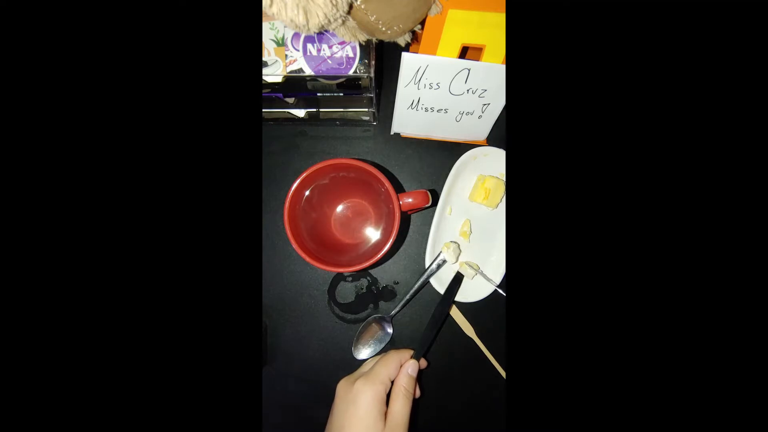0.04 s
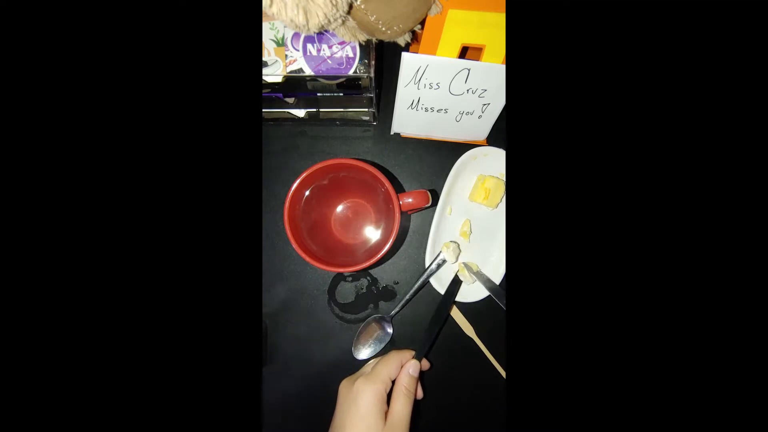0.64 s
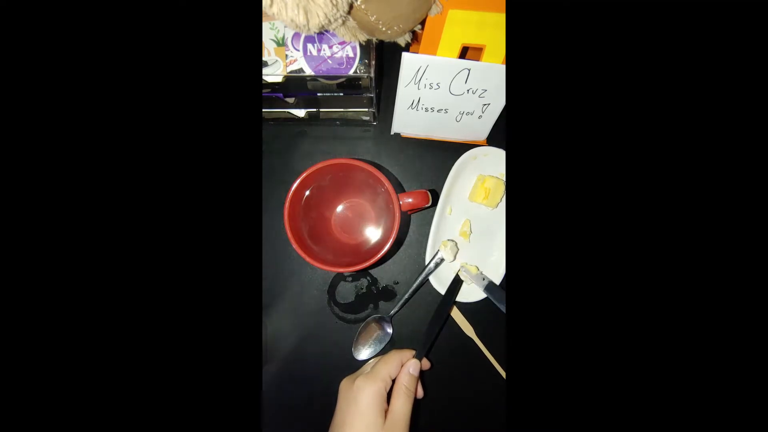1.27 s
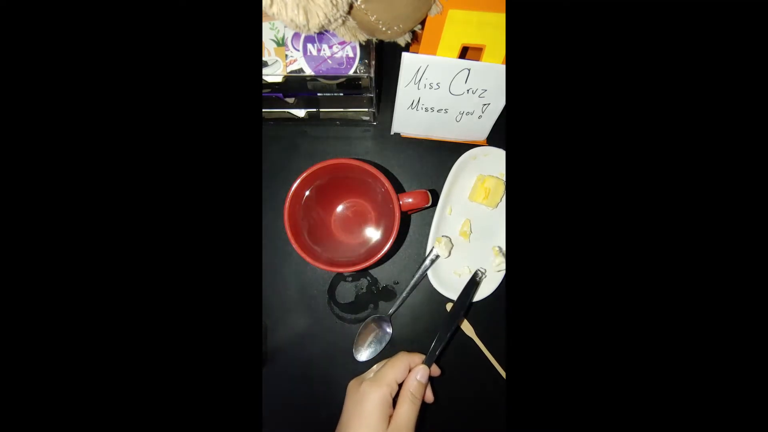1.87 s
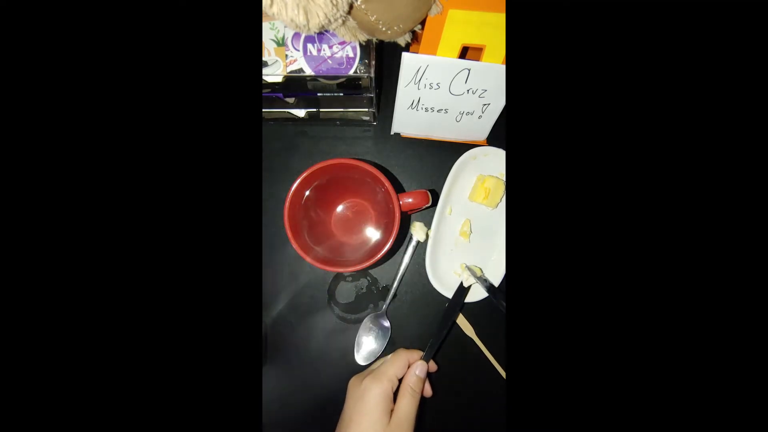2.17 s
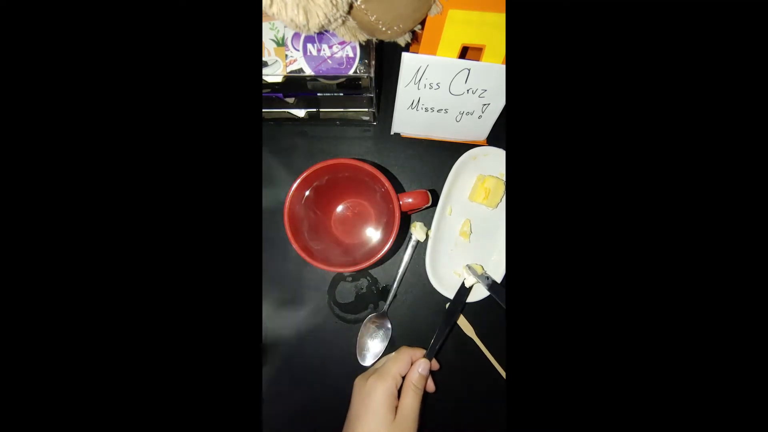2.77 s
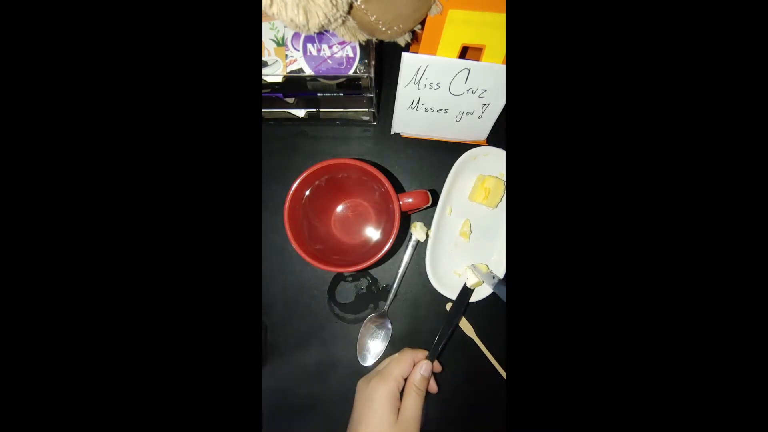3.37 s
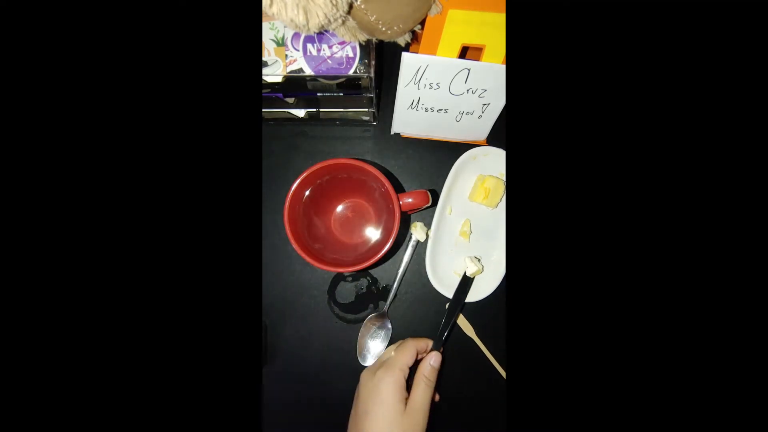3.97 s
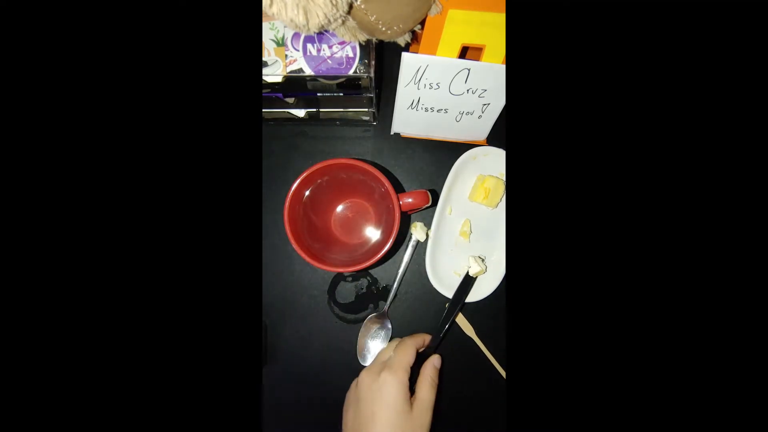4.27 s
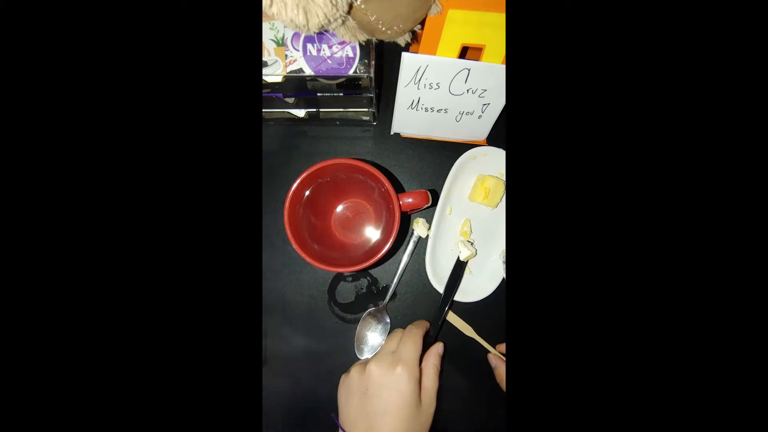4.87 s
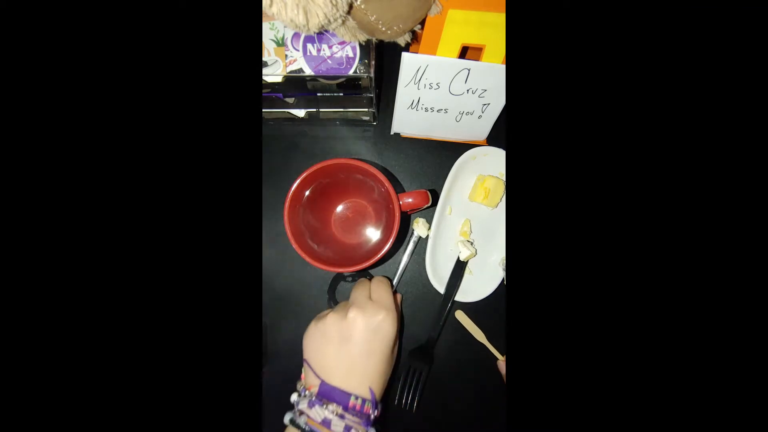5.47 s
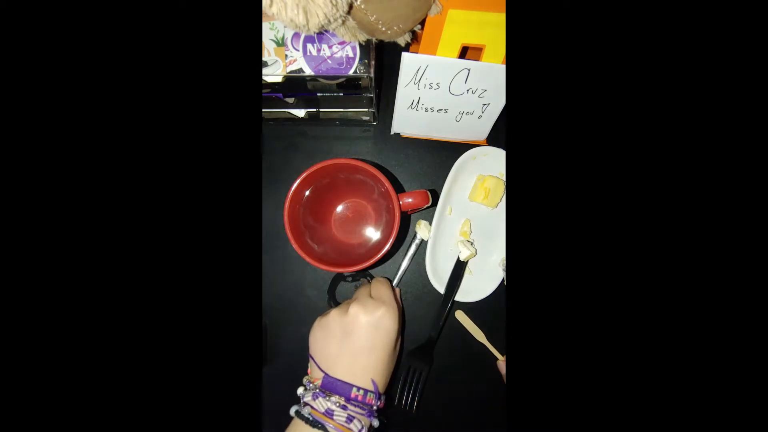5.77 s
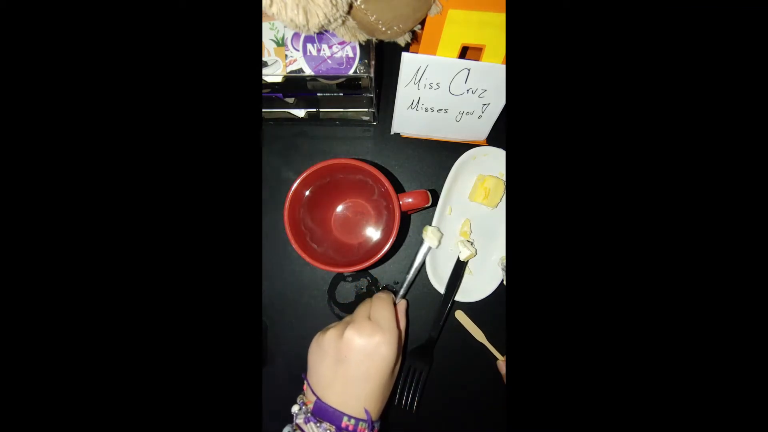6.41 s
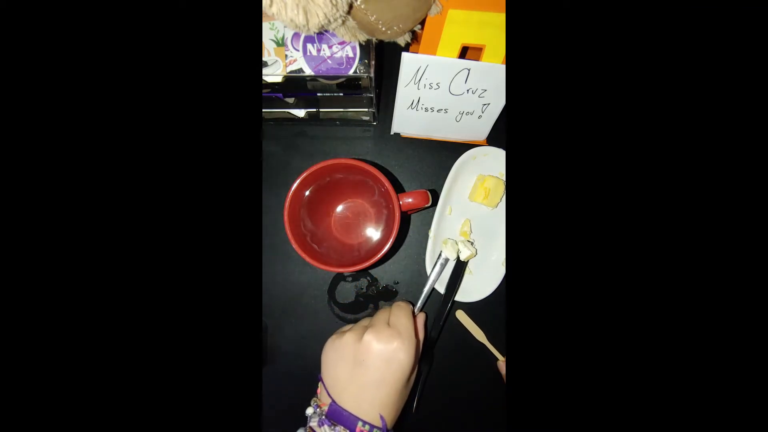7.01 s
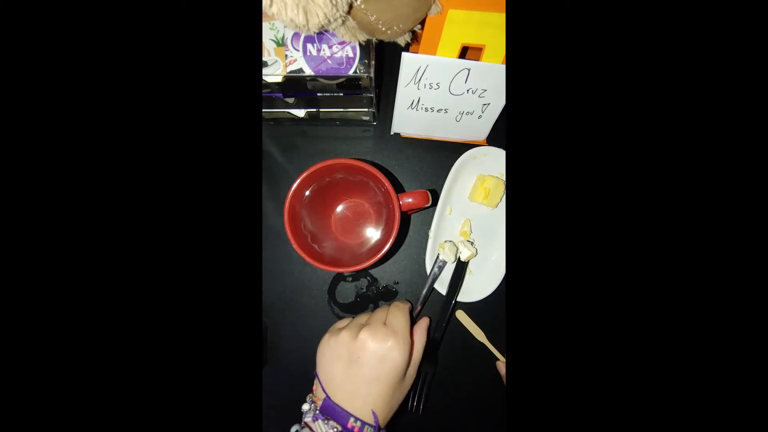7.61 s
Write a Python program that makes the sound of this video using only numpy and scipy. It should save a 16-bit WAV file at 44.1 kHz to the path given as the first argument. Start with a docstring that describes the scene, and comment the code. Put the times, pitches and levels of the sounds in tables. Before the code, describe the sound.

Heard from close by at a desk in a quiet, small room, a knife taps a ceramic plate and makes a run of muffled knocks. A steel spoon slides off and lands with a ringing rattle, followed by more soft knocks and short twangs of cutlery. The spoon is nudged with small clinks, a brief low hum passes, and the spoon is laid back, clinking on the plate and bouncing on the desk.

```python
"""A desk in a small room, a phone microphone close by; over a faint rumble, a metal spoon and a plastic
fork lie with their handles on a ceramic plate. A knife clicks on the plate and presses butter onto the
fork, thumping the desk. At 2 s the spoon slips off the rim, clatters, buzzes and rocks to rest; handles
flex and twang. From 4.6 s a hand nudges the spoon and lifts it, with a brief low drone. Near 7 s it
lays the handle back on the plate and lets the bowl drop, and the steel bounces and rings."""
import sys
import numpy as np
from scipy import signal
from scipy.fft import rfft, irfft, next_fast_len
from scipy.io import wavfile

SR = 44100
rng = np.random.default_rng(int(sys.argv[2]) if len(sys.argv) > 2 else 0)


def to_wav(sig):
    """Store sig (one row per channel, or 1-D mono) as 16-bit WAV at the path in sys.argv[1].

    Samples outside -1..1 are clipped; the rate is SR.
    """
    pcm = np.clip(np.atleast_2d(sig), -1, 1) * 32767
    pcm = np.round(pcm).astype(np.int16)
    wavfile.write(sys.argv[1], SR, pcm.T)  # frames by channels


N = 341642
T = np.arange(SR // 2) / SR  # time within one hit [s]

# ringing modes of what is struck: (frequency [Hz], relative level [dB], t60 [s])
DESK_MODES = [(56, -3, .2), (78, -11, .15), (104, -2, .19), (129, 0, .19), (178, -8, .15)]
BOARD_MODES = [(260, -3, 0.11), (356, -0.5, 0.11), (438, -2.5, 0.081), (525, -0.5, 0.019), (596, -1, 0.14),
               (718, -2.5, .08), (867, -4.5, 0.025), (1070, -9.5, 0.033), (1017, -12, 0.051),
               (1354, -10, 0.081)]  # the desk's higher, woody modes
PLATE_MODES = [(993, 2.5, .035), (1407, -10, 0.037), (2822, -2.5, 0.038), (3230, -4, 0.049),
               (3310, 0.5, 0.03), (4840, -7, .025), (6420, -7.5, 0.094), (6700, -7, .025)]
FREE_SPOON_MODES = [(3607, -8, .2), (4479, -12, .19), (5211, -1, .23), (6245, -9, .16), (6912, -5, .21),
                    (7860, -21, .22), (9663, -10, .16), (9792, -13, .17), (11850, -18, .12),
                    (12130, -19, .1)]
NUDGED_SPOON_MODES = [(345, -15, .15), (1348, -11, .14), (3200, -10, .035), (3262, -8, .065),
                      (4540, -19, .04), (5125, -12, .05), (5350, -8, .03), (5426, -2, .07),
                      (6460, -19, .07), (6910, -17, .04), (7900, -21, .05), (8930, -17, .04),
                      (10548, -19, .045)]
HANDLE_MODES = [(1570, -6.5, 0.021), (2770, -8.5, 0.037), (3265, 0.5, .05), (3788, -10, .04),
                (4660, -0.5, 0.028), (5280, -4.5, 0.046), (6250, -9.5, .04), (6680, -5.5, 0.058),
                (7950, -9.5, .045)]
BOWL_MODES = [(1980, -1.5, 0.29), (2330, -4.5, .09), (2520, -1.5, 0.1), (3260, -2, 0.089),
              (3640, -3, 0.076), (3650, -3.5, .06), (4490, -7, 0.037), (5450, -11, .08)]
# colours of contacts and noises: (frequency [Hz], relative spectral level [dB])
KNOCK_COLOUR = [(60, -26), (230, -15), (400, -2), (620, 0), (820, -6), (1050, -4), (1500, -14), (2500, -36),
                (5000, -70)]
CLACK_COLOUR = [(700, -36), (1400, 3.5), (2200, 3.5), (2900, -5), (4000, -13), (7000, -36.5), (12000, -70)]
SNAP_COLOUR = [(1800, -38), (2800, -5), (3500, 4.5), (4100, -3.5), (5200, -7), (6900, -9), (7700, -29),
               (12000, -59.5)]
TING_COLOUR = [(2300, -40), (3250, 0), (3900, -22), (4800, -16), (5380, 0), (5900, -14), (7000, -16),
               (8200, -28), (13000, -70)]
CRACK_COLOUR = [(3000, -30), (6500, -4), (8600, 0), (10700, -4), (11900, -10), (12700, -36), (15500, -45)]
RUMBLE_COLOUR = [(25, -11), (55, 0), (100, 0), (190, -1.5), (300, -8), (600, -14.5), (1100, -24),
                 (2100, -29.5), (4000, -35), (6600, -39), (9000, -46), (12000, -45), (15000, -48.5)]
RUB_COLOUR = [(150, -11), (450, 5), (800, -1), (1500, -15), (2600, -15), (5000, -23.5), (10000, -31),
              (13000, -42.5)]
HISS_COLOUR = [(1000, -12.5), (5000, 5), (10500, -3.5), (13000, -28)]
# the small room's decay: (frequency [Hz], t60 [s])
ROOM_DECAY = [(100, 0.39), (400, 0.36), (1500, 0.19), (4000, .26), (7000, 0.074), (11000, 0.11)]
# width of diffuse sound at the microphones: (frequency [Hz], side minus mid [dB])
STEREO_WIDTH = [(100, -12.5), (300, -9.5), (600, -3), (1200, 0), (3000, -0.5), (10000, 0)]
# hard touches: (time [s], relative desk knock [dB], relative clink [dB])
KNIFE_ON_PLATE = [(0.6315, -25, -28.5), (1.04, -76.5, -83), (1.2249, -55, -73.5), (2.6863, -49.5, -72),
                  (3.674, -86, -72.5), (3.89, -71, -76)]
HANDLE_ON_PLATE = [(2.0761, -55, -61), (2.171, -39, -53), (6.7062, -39, -53.5), (6.969, -54.5, -87),
                   (7.147, -69.5, -55.5), (7.16, -60, -54), (7.322, -35, -25.5)]
SPOON_NUDGES = [(2.1229, -53, -49), (4.585, -77, -79), (4.828, -73.5, -64.5), (4.893, -58, -49),
                (5.3195, -52, -37.5), (5.3343, -51, -41), (7.1456, -60, -52)]
# hiss after bright clicks: (time [s], level [dB])
HISS_SWELLS = [(0.649, -65), (5.42, -68.5)]
# knife and fingers press: (time [s], relative knock [dB], relative thump [dB])
SOFT_PRESSES = [(0.724, -34.5, -44.5), (1.047, -43.5, -39.5), (1.145, -34.5, -43), (1.223, -25, -37.5),
                (1.245, -45, -45), (1.367, -43, -43.5), (1.604, -35.5, -42), (2.329, -36, -42.5),
                (2.554, -35, -51.5), (2.655, -29.5, -52), (2.685, -37.5, -44.5), (3.010, -57, -50.5),
                (3.191, -52.5, -68.5), (3.504, -48, -64), (4.688, -49, -75), (4.966, -44.5, -67.5),
                (5.575, -42, -51), (5.659, -42, -58.5), (5.741, -52.5, -85)]
# the spoon's handle slips on the plate: (time [s], length [s], starting level [dB])
HANDLE_SLIPS = [(1.92, 0.052, -75), (2.055, 0.12, -64.5)]
# the spoon lands on the desk: (time [s], relative knock [dB], relative clink [dB], free ring [dB],
# first flight [s], left minus right [dB])
SPOON_LANDINGS = [(2.1868, -17, -29, -37, 0.037, 2.5), (2.199, -22, -36, -37.5, 0.0096, -6.5),
                  (7.3084, -17.5, -38, -48, 0.025, -2.5)]
# a handle flexes: (time [s], frequency [Hz], level [dB], t60 [s])
HANDLE_TWANGS = [(2.552, 279, -33.5, 0.055), (2.828, 265.3, -35, 0.24), (3.5, 345.5, -35.5, 0.057),
                 (4.687, 507, -46, 0.14), (4.893, 376.4, -44.5, 0.2), (5.321, 330.3, -33.5, 0.082)]


def amp(db):
    """Decibels to gain."""
    return 10 ** (np.asarray(db) / 20)


def along(points, hz):
    """Read (frequency, value) points on a log frequency axis."""
    f, v = np.transpose(points)
    return np.interp(np.log(hz + 1), np.log(f + 1), v)


def add(track, s, sound):
    """Lay a stereo sound into the track at s seconds."""
    rest = track[:, round(s * SR):]
    rest[:, :sound.shape[1]] += sound[:, :rest.shape[1]]


def unit_hit(x):
    """Scale a hit so that its mean power equals the number of samples in 30 ms."""
    return x / np.sqrt(np.sum(x ** 2) / len(x) / (.03 * SR))


def panned(x, pan_db):
    """Favour the left microphone by pan_db."""
    return x * amp([[pan_db / 2], [-pan_db / 2]])


def spread(pair):
    """Two unrelated signals as mid and side: the bass stays near mono."""
    size = pair.shape[1]
    side = irfft(rfft(pair[1]) * amp(along(STEREO_WIDTH, np.fft.rfftfreq(size, 1 / SR))), size)
    return np.array([pair[0] + side, pair[0] - side])


def noise(colour):
    """Steady, diffuse stereo noise of rms 1."""
    size = next_fast_len(N)
    gain = amp(along(colour, np.fft.rfftfreq(size, 1 / SR)))
    x = spread(irfft(rfft(rng.standard_normal((2, size))) * gain, size))
    return x[:, :N] / x.std()


def swell(s, hold_s, db, attack_s, release_s, slope_db_per_s=0):
    """Gain that rises 60 dB per attack_s up to s, holds or slopes, then falls 60 dB per release_s."""
    t = np.arange(N) / SR - s
    outside = np.maximum(-t, 0) / attack_s + np.maximum(t - hold_s, 0) / release_s
    return amp(db + slope_db_per_s * np.clip(t, 0, hold_s) - 60 * outside)


def room_rumble(db=-66.5):
    """The room's steady, low background."""
    return amp(db) * noise(RUMBLE_COLOUR)


def burst(colour, t60, scatter, lag_s=0.00022):
    """A sharp push, later at the left microphone, and its dying scatter from things nearby."""
    size = len(T)
    hz = np.fft.rfftfreq(size, 1 / SR)
    push = unit_hit(irfft(np.exp(-2j * np.pi * hz * np.array([[lag_s], [0]])), size))
    scattered = unit_hit(spread(rng.standard_normal((2, size))) * amp(-60 * T / t60))
    # minimum-phase colour: nothing sounds ahead of the push
    cepstrum = irfft(np.log(amp(along(colour, hz))), size)
    cepstrum[1:size // 2] *= 2
    cepstrum[size // 2 + 1:] = 0
    coloured = irfft(rfft(scatter * scattered - push) * np.exp(rfft(cepstrum)), size)
    fade = np.minimum(1, np.arange(size)[::-1] / (size / 2)) ** 2
    return unit_hit(coloured * fade)


def ring(modes, vary_db, phase_rad):
    """Damped modes, each at a random strength and a random phase between the microphones."""
    hz, db, t60 = np.transpose(modes)[:, :, None]
    strength, angle = rng.standard_normal((2, len(modes), 1))
    onset = 1 - np.exp(-(np.pi * hz * T) ** 2)
    polarity = (-1) ** np.arange(len(modes))[:, None]
    envelope = amp(db + vary_db * strength - 60 * T / t60) * onset * polarity
    pair = [envelope * np.sin(2 * np.pi * hz * T + side * phase_rad * angle) for side in (1, -1)]
    return unit_hit(np.sum(pair, axis=1))


def in_room(x, wet_db, build_s=0.0028):
    """The close walls answer a hit with a tail whose treble dies first."""
    hz, t, spectra = signal.stft(rng.standard_normal((2, len(T))), SR, nperseg=256)
    decay = amp(-60 * t / along(ROOM_DECAY, hz)[:, None])
    tail = signal.istft(spectra * decay, SR, nperseg=256)[1][:, :len(T)]
    tail = spread(tail * (1 - np.exp(-(T / build_s) ** 2)))
    return x + amp(wet_db) * signal.fftconvolve(x, tail / np.linalg.norm(tail[0]), axes=1)[:, :len(T)]


def desk_thump():
    """The whole desk top booms, nearer to the left microphone."""
    return panned(ring(DESK_MODES, vary_db=3, phase_rad=0.33), pan_db=5)


def contact(knock_db, clink_db, modes, snap, thump_db, clack_db, crack_db, ring_db, snap_db, board_db):
    """A hard hit: its weight knocks the desk and clacks the cutlery; its edge rings what was struck."""
    board = amp(board_db) * ring(BOARD_MODES, vary_db=3, phase_rad=.5)
    knock = burst(KNOCK_COLOUR, t60=0.039, scatter=1) + board
    weight = amp(-1.5) * knock + amp(thump_db) * desk_thump()
    weight += amp(clack_db) * burst(CLACK_COLOUR, t60=.05, scatter=1.5)
    edge = amp(ring_db) * ring(modes, vary_db=3.5, phase_rad=1)
    edge += amp(snap_db) * burst(snap, t60=0.034, scatter=9)
    edge += amp(crack_db) * burst(CRACK_COLOUR, t60=0.015, scatter=4.1)
    return amp(knock_db) * weight + amp(clink_db) * edge


def knife_clicks():
    """The knife strikes the plate, just right of centre, and the ceramic rings briefly."""
    out = np.zeros((2, N))
    for s, knock_db, clink_db in KNIFE_ON_PLATE:
        hit = contact(knock_db, clink_db, PLATE_MODES, SNAP_COLOUR, thump_db=-7, clack_db=-40.5,
                      crack_db=-15, ring_db=0, snap_db=-5, board_db=-4)
        add(out, s, in_room(panned(hit, pan_db=-2.5), wet_db=-13))
    return out


def hiss():
    """A soft, wide hiss lingers after two bright clicks."""
    gain = sum(swell(s, hold_s=0.07, db=db, attack_s=0.15, release_s=0.35) for s, db in HISS_SWELLS)
    return gain * noise(HISS_COLOUR)


def soft_blow(knock_db, thump_db, soft_hz=450, hardening=0.44):
    """Butter and fingers cushion the blow; a harder one squeezes through and sounds brighter."""
    cutoff_hz = np.clip(soft_hz * amp(hardening * (knock_db + 16)), 400, 2000)
    cushion = signal.butter(2, cutoff_hz, fs=SR, output="sos")
    knock = burst(KNOCK_COLOUR, t60=0.072, scatter=3.4)
    knock += amp(0.5) * ring(BOARD_MODES, vary_db=2, phase_rad=0.6)
    hit = amp(knock_db - 12) * unit_hit(signal.sosfilt(cushion, knock)) + amp(thump_db) * desk_thump()
    return in_room(panned(hit, pan_db=-3), wet_db=-7)


def presses(settle_s=0.022):
    """Each press knocks the plate on the desk; it sits back with a weaker knock and a fuller thump."""
    out = np.zeros((2, N))
    for s, knock_db, thump_db in SOFT_PRESSES:
        add(out, s, soft_blow(knock_db, thump_db - 2))
        add(out, s + settle_s, soft_blow(knock_db - 7.5, thump_db))
    return out


def grains(gain, body, per_s):
    """Tiny contacts at random times, each answered by the body."""
    hits = rng.standard_normal(N) * (rng.random(N) < per_s / SR)
    force = gain * hits / hits.std()
    return signal.fftconvolve(force[None], body / np.linalg.norm(body[0]), axes=1)[:, :N]


def handle_slips():
    """Steel slips on glaze, ringing handle and plate, louder as it gathers speed."""
    body = ring(HANDLE_MODES, vary_db=0.5, phase_rad=0.55)
    body += amp(0.5) * ring(PLATE_MODES, vary_db=1.5, phase_rad=0.73)
    gain = sum(swell(s, length_s, db, attack_s=0.12, release_s=0.04, slope_db_per_s=89.5)
               for s, length_s, db in HANDLE_SLIPS)
    return grains(gain, body, per_s=200)


def handle_taps():
    """The spoon's handle touches the plate and rings, right of centre."""
    out = np.zeros((2, N))
    for s, knock_db, clink_db in HANDLE_ON_PLATE:
        hit = contact(knock_db, clink_db, HANDLE_MODES, SNAP_COLOUR, thump_db=-7.5, clack_db=-10.5,
                      crack_db=-32, ring_db=-1.5, snap_db=-9.5, board_db=-5.5)
        add(out, s, in_room(panned(hit, pan_db=-3), wet_db=-11.5))
    return out


def spoon_tings():
    """The spoon is nudged against its neighbours and tings with a short, bright bite."""
    out = np.zeros((2, N))
    for s, knock_db, clink_db in SPOON_NUDGES:
        hit = contact(knock_db, clink_db, NUDGED_SPOON_MODES, TING_COLOUR, thump_db=-1, clack_db=-12.5,
                      crack_db=-16.5, ring_db=-2.5, snap_db=-3.5, board_db=-6)
        add(out, s, in_room(panned(hit, pan_db=-3.5), wet_db=-11))
    return out


def bounces(s, flight_s, shrink, loss_db, count):
    """Contacts that come ever sooner and weaker: (time [s], level [dB])."""
    return [(s + flight_s * sum(shrink ** j for j in range(k)), -loss_db * k) for k in range(count)]


def spoon_drops():
    """The bowl bounces on the desk, and the thin, high modes of the undamped steel ring on."""
    out = np.zeros((2, N))
    for s, knock_db, clink_db, free_db, flight_s, pan_db in SPOON_LANDINGS:
        steel = amp(free_db) * ring(FREE_SPOON_MODES, vary_db=1, phase_rad=1)
        add(out, s, in_room(steel, wet_db=-6.5))
        for at, db in bounces(s, flight_s, shrink=0.52, loss_db=6, count=4):
            hit = contact(knock_db + db, clink_db + db, BOWL_MODES, SNAP_COLOUR, thump_db=-15,
                          clack_db=-9, crack_db=-42.5, ring_db=-3.5, snap_db=-2, board_db=-6.5)
            add(out, at, in_room(panned(hit, pan_db), wet_db=-9.5))
    return out


def spoon_buzz(start_s=2.195, hold_s=0.065):
    """The fallen spoon buzzes against the desk between its bounces and dies away."""
    wood = burst(KNOCK_COLOUR, t60=0.033, scatter=0.93)
    wood += amp(-3) * ring(BOARD_MODES, vary_db=1, phase_rad=0.4)
    wood += amp(-5.5) * burst(CLACK_COLOUR, t60=0.033, scatter=4.5)
    buzz = swell(start_s, hold_s, db=-27.5, attack_s=0.025, release_s=0.078)
    tail = swell(start_s, hold_s, db=-39.5, attack_s=0.025, release_s=0.5)
    return grains(buzz + tail, in_room(wood, wet_db=-11), per_s=450)


def twangs(swings, attack_s=0.0045):
    """Cutlery rocks or bends over the rim and swings out with faint, short overtones."""
    out = np.zeros((2, N))
    for s, hz, db, t60 in swings:
        tone = sum(amp(db + partial_db - 60 * T * k / t60) * np.sin(2 * np.pi * k * hz * T)
                   for k, partial_db in enumerate([0, -21, -22], 1))
        add(out, s, in_room(panned(tone * (1 - np.exp(-T / attack_s)), pan_db=0), wet_db=-5.5))
    return out


def spoon_rocking(hz=456, first_db=-18, t60=0.043):
    """The spoon rocks to rest on its bowl, each swing shorter and weaker."""
    swings = bounces(s=2.3, flight_s=0.064, shrink=0.73, loss_db=6.5, count=3)
    return twangs([(s, hz, first_db + db, t60) for s, db in swings])


def hand_slide():
    """A hand rubs faintly over the desk."""
    return swell(s=4.87, hold_s=0.36, db=-68, attack_s=1.9, release_s=5.5) * noise(RUB_COLOUR)


def drone(hz=166, beat_hz=21, depth=0.75):
    """Two close, low tones throb while the spoon is moved."""
    t = np.arange(N) / SR
    tones = np.sin(2 * np.pi * hz * t) + depth * np.sin(2 * np.pi * (hz + beat_hz) * t)
    return tones * swell(s=6.36, hold_s=0.14, db=-48, attack_s=0.26, release_s=0.29)


def scene():
    """Everything on the desk, in close stereo."""
    buttering = room_rumble() + knife_clicks() + hiss() + presses()
    spoon = handle_slips() + handle_taps() + spoon_tings() + spoon_drops() + spoon_buzz()
    return buttering + spoon + spoon_rocking() + twangs(HANDLE_TWANGS) + hand_slide() + drone()


def record(dry, top_hz=15700):
    """The phone rounds off the highest peaks and keeps nothing above its band limit."""
    limited = dry / (1 + np.abs(dry) ** 6) ** (1 / 6)
    size = next_fast_len(N + SR // 2)
    return irfft(rfft(limited, size) * (np.fft.rfftfreq(size, 1 / SR) < top_hz), size)[:, :N]


dry = scene()
out = record(dry)
to_wav(out)
```